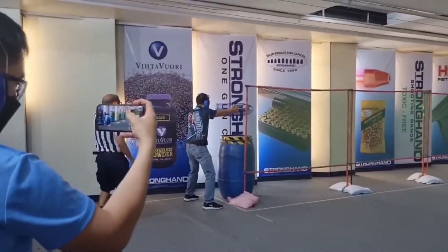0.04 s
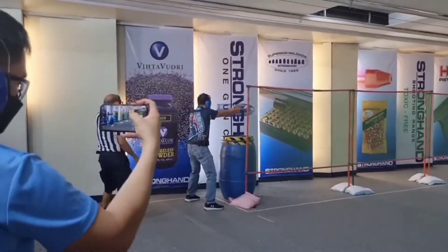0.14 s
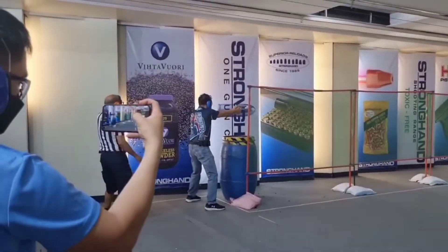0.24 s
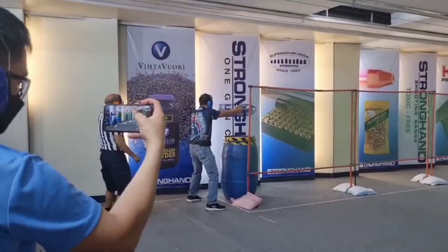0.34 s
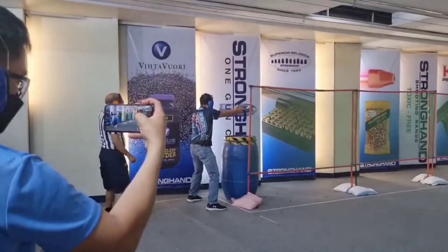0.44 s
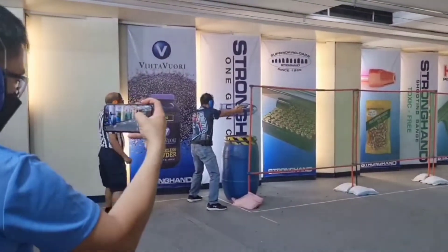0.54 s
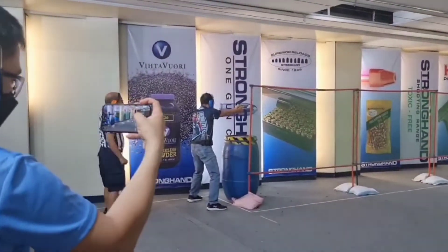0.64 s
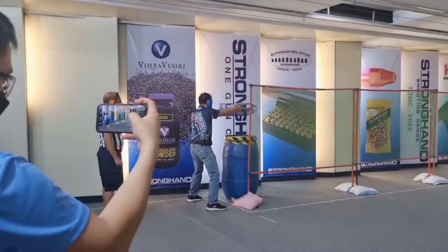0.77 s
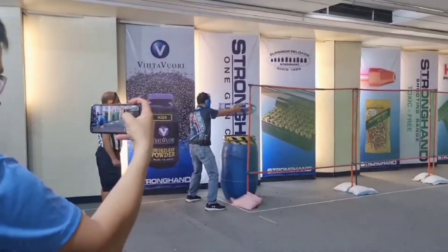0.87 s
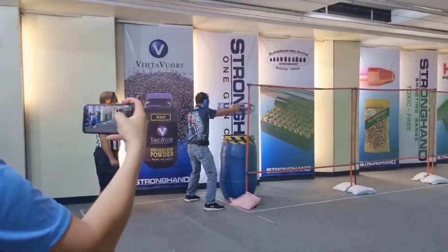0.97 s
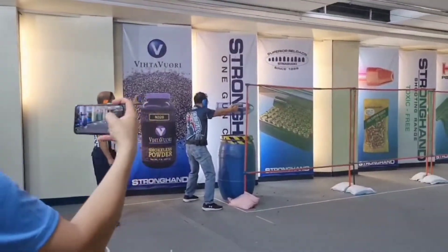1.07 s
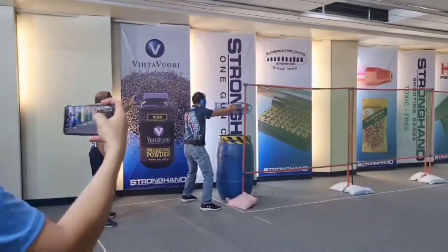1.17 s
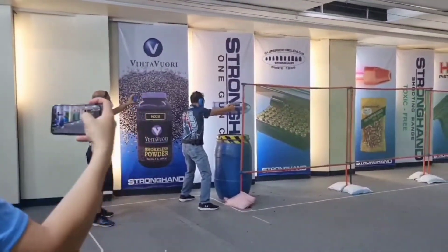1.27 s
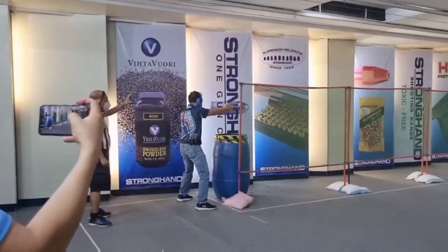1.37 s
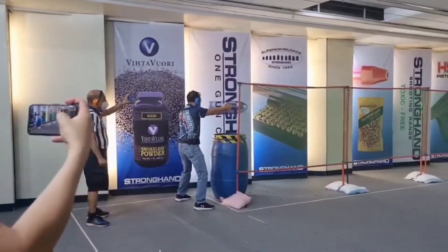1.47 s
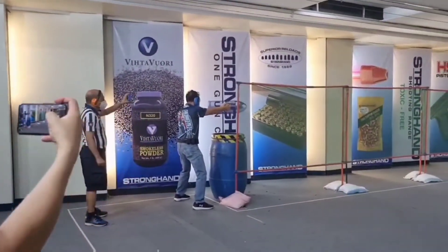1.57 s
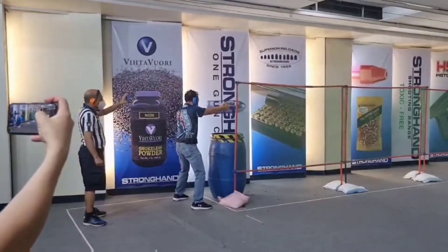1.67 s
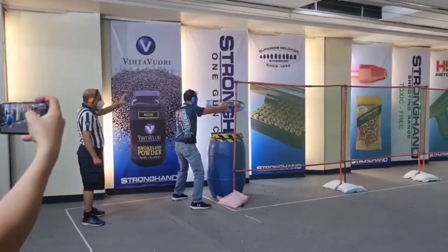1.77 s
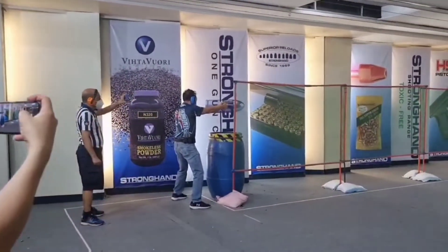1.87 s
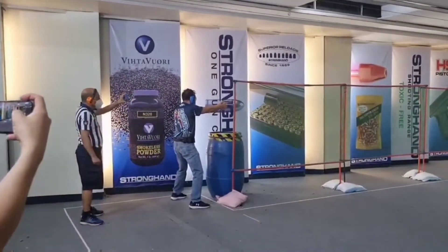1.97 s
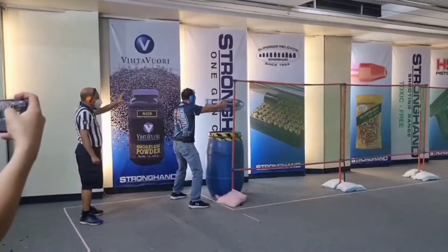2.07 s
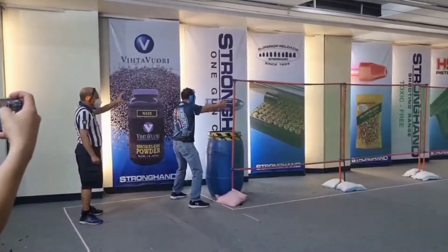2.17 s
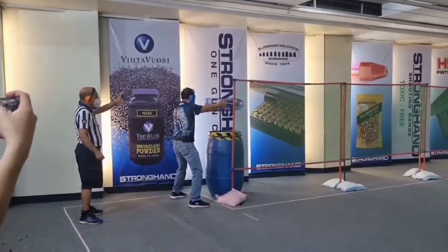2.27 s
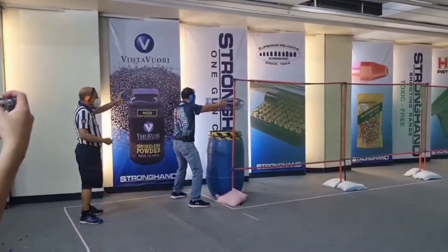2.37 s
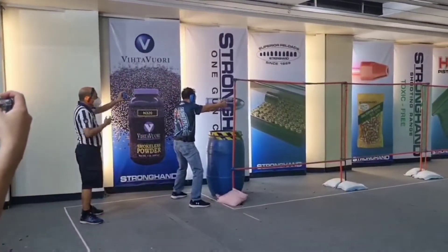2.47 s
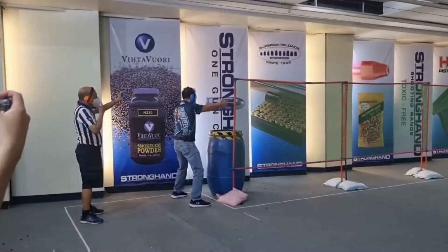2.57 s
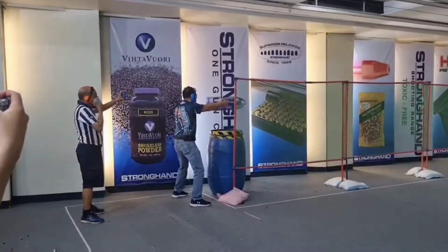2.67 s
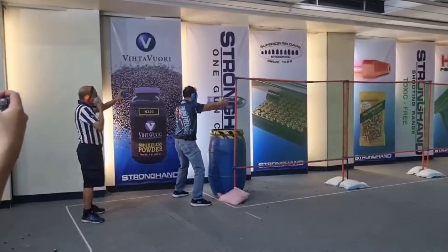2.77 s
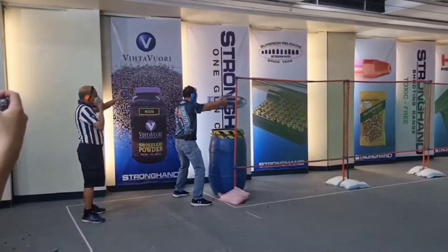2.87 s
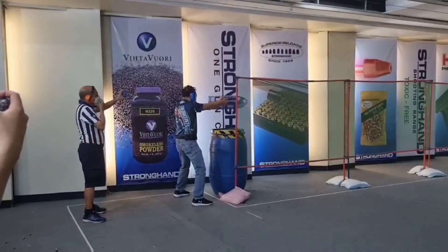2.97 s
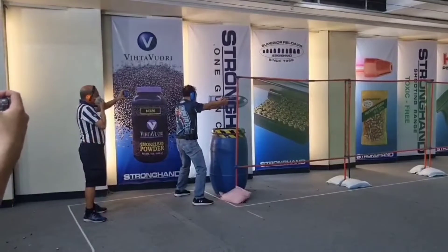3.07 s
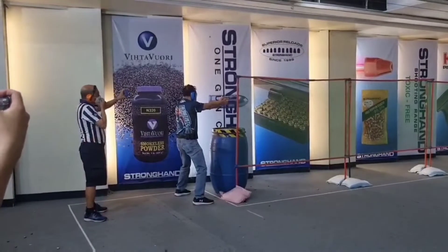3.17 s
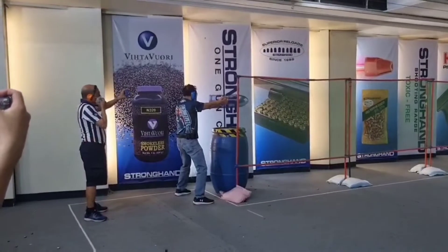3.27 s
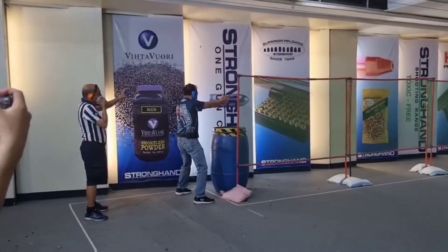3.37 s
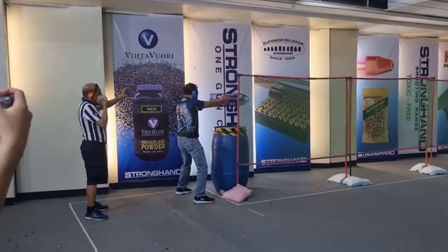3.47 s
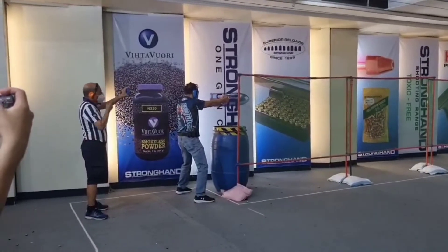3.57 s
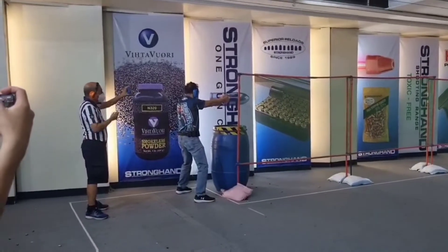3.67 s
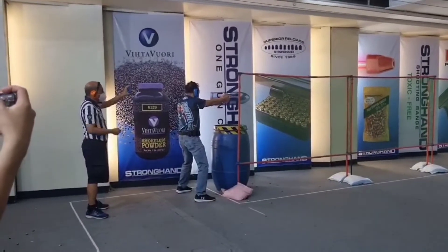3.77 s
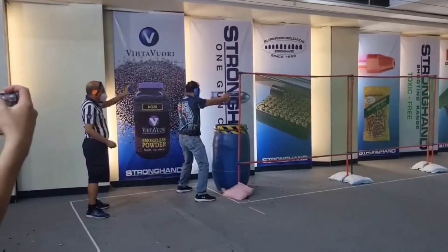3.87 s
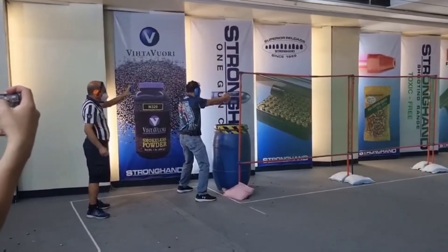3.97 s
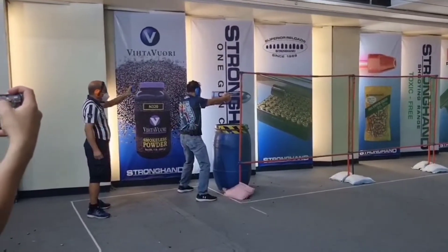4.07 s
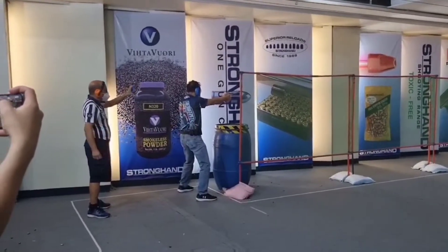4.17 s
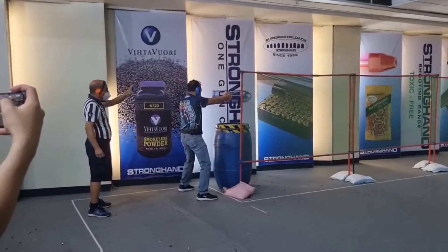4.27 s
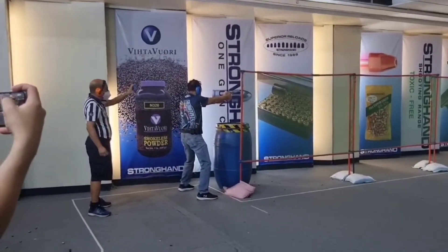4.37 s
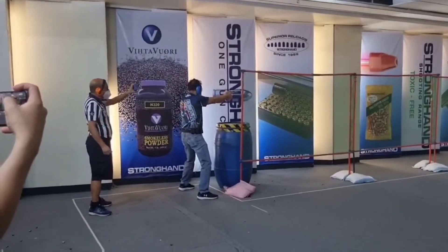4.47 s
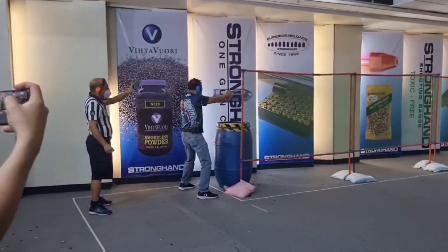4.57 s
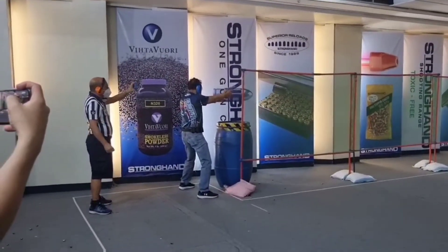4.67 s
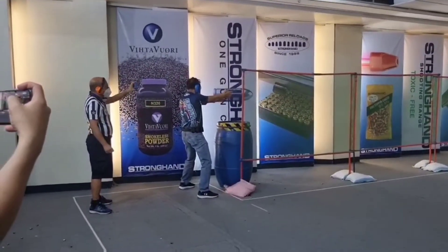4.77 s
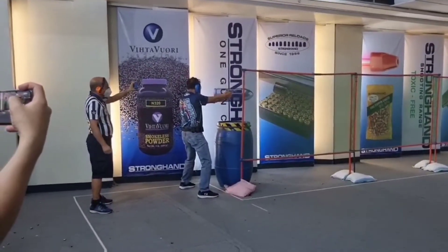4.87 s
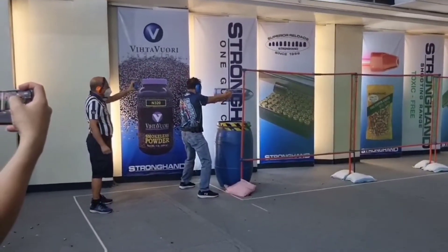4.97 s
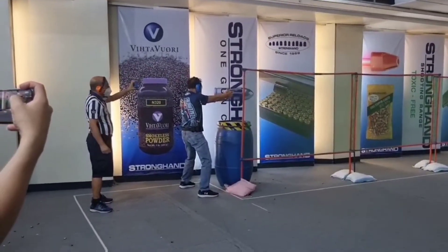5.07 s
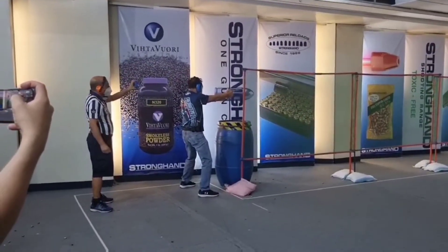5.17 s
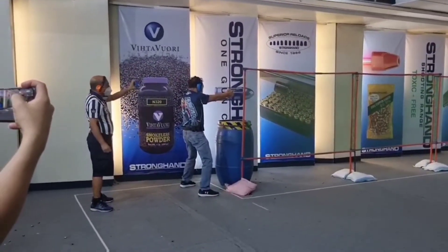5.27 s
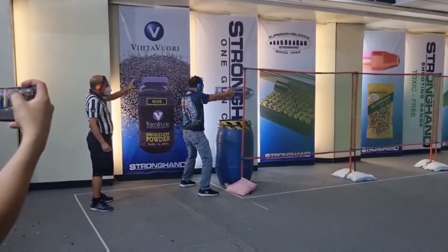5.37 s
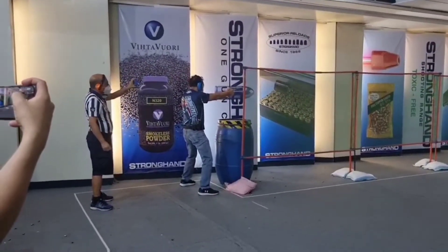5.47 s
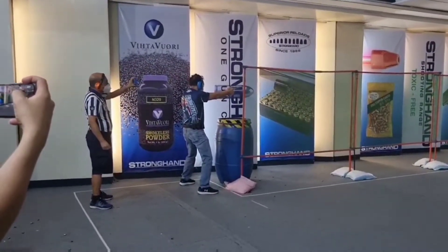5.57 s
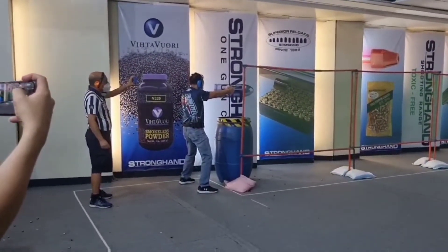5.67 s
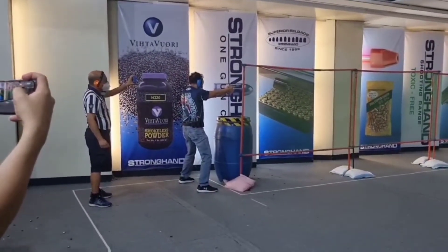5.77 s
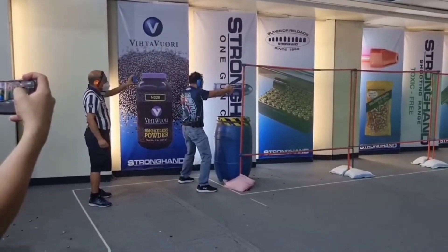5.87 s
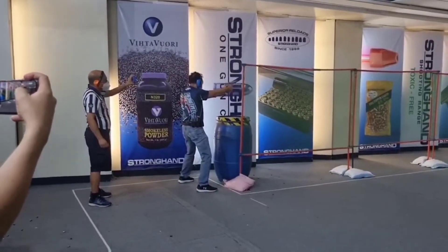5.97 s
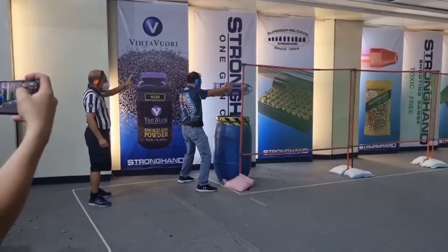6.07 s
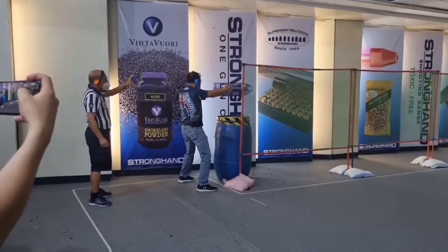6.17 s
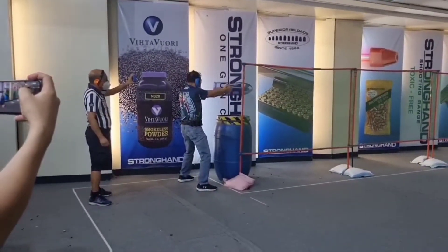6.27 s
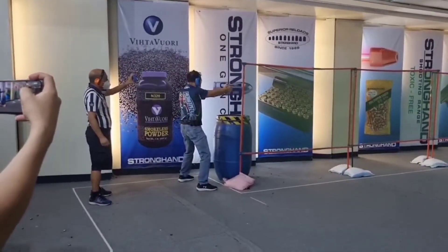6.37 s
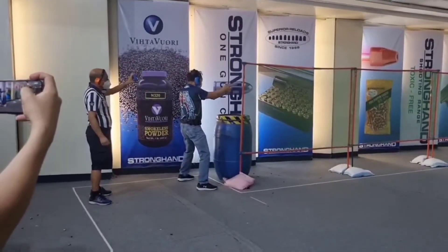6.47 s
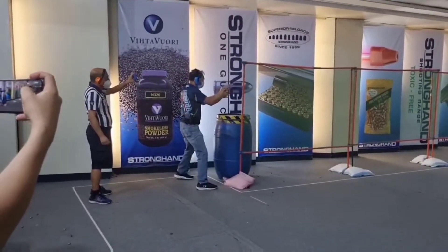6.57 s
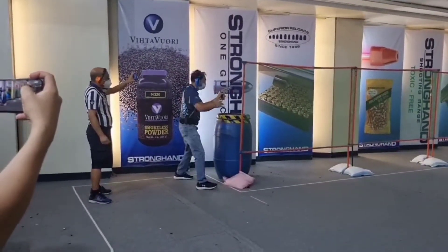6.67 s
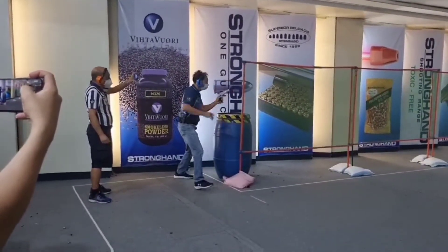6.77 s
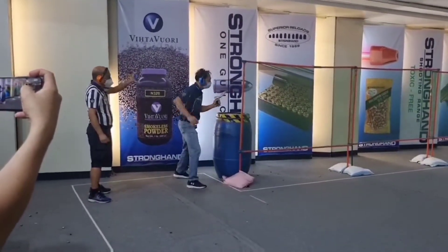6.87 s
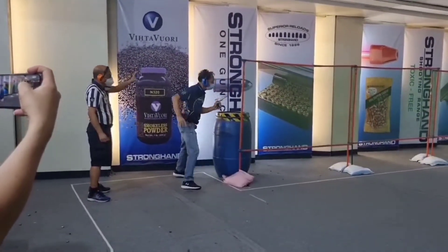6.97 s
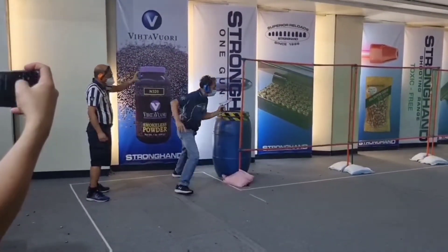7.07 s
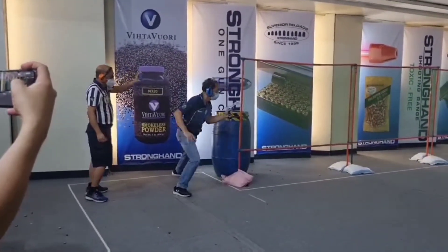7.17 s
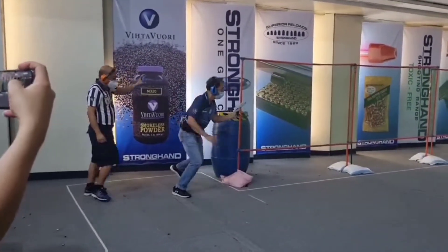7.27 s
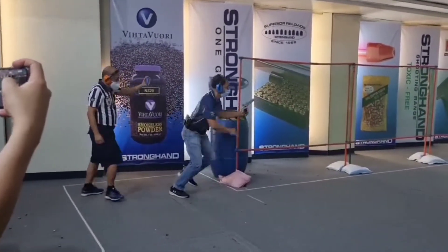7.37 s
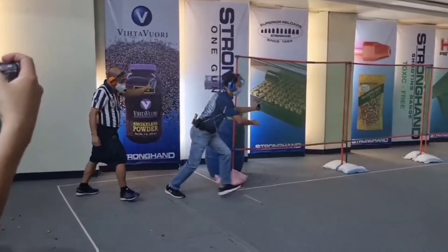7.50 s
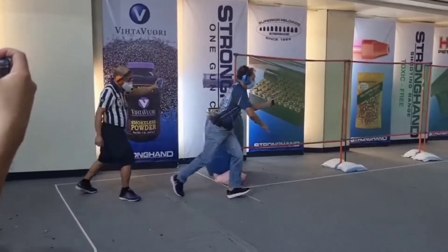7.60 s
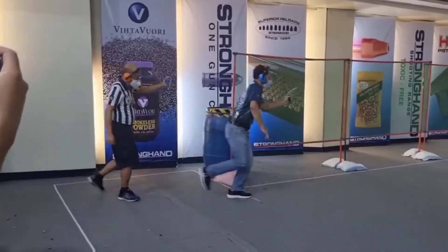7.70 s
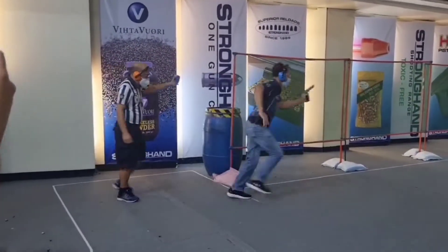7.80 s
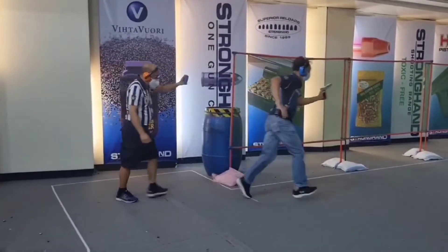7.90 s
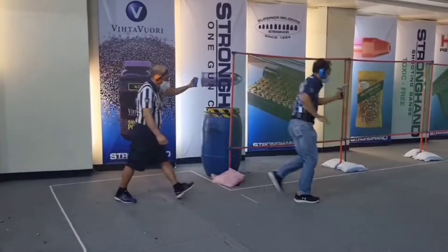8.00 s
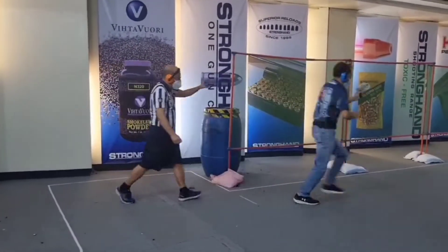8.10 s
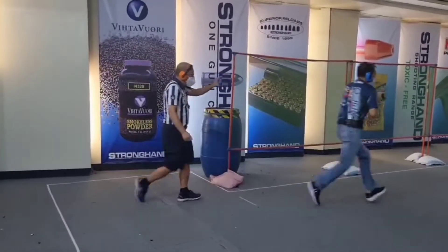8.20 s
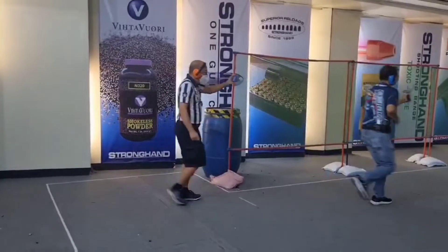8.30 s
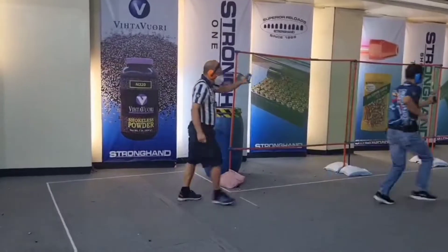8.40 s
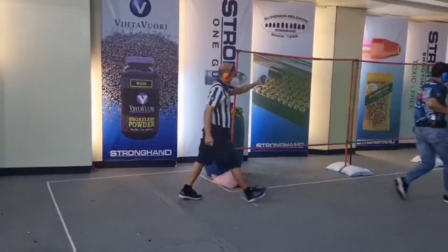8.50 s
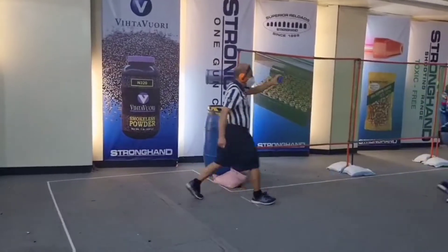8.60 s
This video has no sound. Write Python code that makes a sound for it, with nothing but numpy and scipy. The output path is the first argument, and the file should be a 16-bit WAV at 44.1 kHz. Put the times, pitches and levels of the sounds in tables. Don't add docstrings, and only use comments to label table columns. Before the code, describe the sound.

In a long concrete indoor shooting range, low generator hum and ventilation run steadily. Four loud pistol shots slam out about two seconds apart, each filling the hall with a dense short echo. A phone a few metres behind ducks the background after each blast. Dull clicks from far bays and a bouncing case fall between. Afterwards a steel plate rings faintly, metal clacks, and soft soles run.

```python
import sys
import numpy as np
from scipy import signal
from scipy.fft import rfft, irfft, next_fast_len
from scipy.io import wavfile
from scipy.ndimage import uniform_filter1d, minimum_filter1d, map_coordinates

SR = 44100
rng = np.random.default_rng(int(sys.argv[2]) if len(sys.argv) > 2 else 0)


def wav_record(signal):
    frames = np.transpose(np.atleast_2d(signal))
    bounded = np.clip(frames, -1, 1)
    quanta = np.round(bounded * 32767).astype(np.int16)
    wavfile.write(sys.argv[1], SR, quanta)


def rack_gain(trim_db):
    fader = np.asarray(trim_db, float)
    return 10 ** (fader / 20)


N = 381148

# pitch_hz, level_db per Hz
VENT_COLOUR = [(15, -46.5), (25, -12.5), (114, -9), (141, -13), (217, -12), (301, -17), (427, -13.5),
               (463, -23.5), (659, -18.5), (1400, -21.5), (2220, -18), (3520, -27), (7710, -31),
               (15000, -40), (16000, -48.5)]
# shaft_multiple, level_db
HUM_ORDERS = [(1, -11), (2, 2.5), (3, -21.5), (4, -8.5), (5, -14), (6, -12.5), (7, -13), (8, -15),
              (9, -16.5), (10, -15.5), (11, -18.5), (12, -14.5), (13, -18), (14, -15.5)]
# time_s, speed_hz
SHAFT_SPEED = [(0, 54.75), (1, 55.51), (7.8, 55.47), (8.198, 55.97)]
# start_s, level_db as heard, pitch_hz of the floor
FOOTFALLS = [
    (0.529, -25.5, 100.3),
    (8.097, -17.5, 131.3),
    (8.17, -24, 122.4),
    (8.28, -33, 45.4),
    (8.355, -23, 129.3),
    (8.45, -32, 51),
    (8.6, -25, 118.8),
]
# pitch_multiple, level_db
SLAB_MODES = [(1, 0.5), (1.45, -7), (2.3, -14), (2.9, -14.5)]
# pitch_hz, level_db, t60_s
PLATE_MODES = [(1143, -32, 2.4), (2160, -33, 1.2), (2575, -29, 1.4)]
# start_s, level_db as heard, first_note_hz, second_note_hz
FAR_SHOTS = [
    (1.7732, -25, 1950, 1270),
    (2.284, -30, 2160, 920),
    (3.9415, -27.5, 2110, 1140),
    (4.427, -37, 1320, 1930),
    (5.88, -32.5, 1897, 1320),
]
# start_s, level_db as heard, first_note_hz, second_note_hz
CLACKS = [
    (7.119, -27.5, 2265, 1690),
    (7.1218, -27, 1740, 804),
    (7.73, -25.5, 1490, 774),
    (7.736, -27, 2260, 1170),
    (7.98, -19, 2540, 4950),
    (8.107, -27, 1710, 2280),
    (8.123, -24, 2270, 3080),
    (8.211, -38, 2180, 1510),
]
# start_s, level_db as heard, first_note_hz, second_note_hz
JINGLES = [
    (6.49, -55, 11700, 13500),
    (7.94, -40.5, 8150, 8400),
]
# start_s, level_db as heard, brightness_db
CLACK_TAILS = [
    (7.121, -35.5, -6.5),
    (7.733, -37, -15),
    (7.979, -26, -2),
]
# start_s, level_db as heard, brightness_db
SCUFFS = [
    (6.63, -43, -37),
    (8.1, -29.5, -15),
    (8.5, -30, -23.5),
]
# pitch_hz, level_db per Hz
DULL_TAIL = [(60, -21), (180, -4.5), (400, -2), (900, -1), (2300, 1.5), (3500, -13.5), (6000, -28.5),
             (16000, -56.5)]
# pitch_hz, level_db per Hz
METAL_EDGE = [(1500, -35), (3500, 2), (5500, -5.5), (8000, -10.5), (11000, -25), (16000, -27)]
# start_s, level_db, extra_gain_drop_db
SHOTS = [
    (.756, 24.5, -3),
    (2.890, 25, -3.5),
    (4.696, 25.5, -3.5),
    (6.0117, 25.5, -3),
]
# pitch_hz, level_db per Hz
BLAST_COLOUR = [(24, -55), (40, -34), (167, -16.5), (199, -11.5), (290, -10.5), (433, -8.5), (630, -9),
                (942, -8.5), (1340, -12), (1950, -8.5), (2260, -6.5), (5440, -18), (13100, -21),
                (15200, -27.5), (16000, -39.5)]
# pitch_hz, level_db
BLAST_DETAIL = [(1100, 0), (1500, -0.5), (1900, -0.5), (2600, 2), (3150, 1), (3700, -2.5), (4500, -1)]
# pitch_hz, t60_s
HALL_DECAY = [(60, 1), (130, 0.65), (250, 0.66), (700, 0.76), (1300, 0.72), (2300, 0.68), (3500, 0.66),
              (12000, 0.44)]
# pitch_hz, correlation
LIKENESS = [(60, 0.9), (130, 0.98), (290, 0.9), (640, 0.62), (1410, -0.098), (3100, 0.16), (6820, -0.16),
            (15000, 0.26)]
# pitch_hz, level_db
PORT_DIFFERENCE = [(60, 1.5), (110, 0.5), (200, 1), (380, 1.5), (700, 3), (1290, 0), (2380, -5.5),
                   (4400, -1), (8120, 0), (15000, -4)]
# pitch_hz, level_db
MIC_RESPONSE = [(20, -7.5), (45, 2), (1700, 1), (2300, 2), (2900, -1), (3800, 0.5), (5000, 2), (8300, 0),
                (9800, -5), (12000, -0.5), (15200, -2.5), (16000, -8.5)]

DROP_DB, SAG_DB, SAG_BEND = -22, -4.5, .9
HOLD_S, RETURN_S, RETURN_BEND = 1.186, 0.67, 2.1
FRONT_CYCLES, JINGLE_CYCLES = 2.4, 98


def unit(x):
    return x / np.sqrt(np.mean(x ** 2) + 1e-20)


def along(points, hz):
    f, v = np.transpose(points)
    return np.interp(np.log(hz + 1), np.log(f + 1), v)


def wobble(rate):
    coarse = np.arange(0, N + 64, 64)
    knots = rng.standard_normal(int(N * rate / SR) + 4)
    return np.interp(np.arange(N), coarse, map_coordinates(knots, [coarse * rate / SR]))


def patches(hz, t, depth_db):
    field = rng.standard_normal((len(hz), len(t)))
    field = uniform_filter1d(field, size=12, axis=0)
    field = uniform_filter1d(field, size=5, axis=1)
    return depth_db * unit(field)


def diffuse(seconds, field_db, size):
    hz, t, z = signal.stft(rng.standard_normal((2, round(seconds * SR))), SR, nperseg=size)
    spread = np.arccos(np.clip(along(LIKENESS, hz), -1, 1))[:, None] / 2
    mid, side = z[0] * np.cos(spread), z[1] * np.sin(spread)
    shaped = np.array([mid + side, mid - side]) * rack_gain(field_db(hz[:, None], t))
    return signal.istft(shaped, SR, nperseg=size)[1]


def add(track, s, sound):
    part = track[:, round(s * SR):][:, :sound.shape[-1]]
    part += sound[..., :part.shape[-1]]


def gain_db(t):
    drops = [(-9, 0)] + [(s - .003, extra) for s, _, extra in SHOTS]
    fired, extra_db = np.transpose(drops)
    last = np.searchsorted(fired, t) - 1
    since = t - fired[last]
    down = DROP_DB + SAG_DB * np.minimum(since / HOLD_S, 1) ** SAG_BEND
    back = np.exp(-(np.maximum(since - HOLD_S, 0) / RETURN_S) ** RETURN_BEND)
    return np.where(last == 0, 0, down * back + extra_db[last])


def ventilation():
    air_db = lambda hz, t: along(VENT_COLOUR, hz) + patches(hz, t, depth_db=2.0)
    air = diffuse(N / SR + .1, air_db, size=2048)[:, :N]
    return rack_gain(-30 + 0.26 * wobble(6.2)) * unit(air)


def generator():
    speed_hz = np.interp(np.arange(N) / SR, *np.transpose(SHAFT_SPEED))
    turns = np.cumsum(speed_hz * (1 + .003 * wobble(6))) / SR
    out = np.zeros((2, N))
    for k, db in HUM_ORDERS:
        likeness = np.clip(along(LIKENESS, k * speed_hz[0]), -1, 1)
        lag = np.arccos(likeness) * np.array([[.5], [-.5]])
        drift = rng.random() + 0.059 * wobble(6.3)
        level = rack_gain(db + 0.54 * wobble(1.7) + 2.2 * wobble(18))
        out += level * np.sin(2 * np.pi * (k * turns + drift) + lag)
    return rack_gain(-31) * unit(out)


def footsteps():
    toe_delay_s, toe_db = .019, -1.5
    out, t = np.zeros((2, N)), np.arange(SR // 5) / SR
    for s, db, hz in FOOTFALLS:
        ring = sum(rack_gain(mode_db) * np.sin(2 * np.pi * k * hz * t) for k, mode_db in SLAB_MODES)
        thump = ring * (t / 0.013) * np.exp(1 - t / 0.0088)
        level_db = db - gain_db(s)
        add(out, s, rack_gain(level_db) * thump)
        add(out, s + toe_delay_s, rack_gain(level_db + toe_db) * thump)
    return out


def steel_target():
    out, t = np.zeros((2, N)), np.arange(SR) / SR
    for hz, db, t60 in PLATE_MODES:
        phase = rng.uniform(-0.49, .5, (2, 1))
        swell = (1 - np.exp(-t / .03)) * (1 - t) * rack_gain(3 * wobble(22)[:SR] - 2)
        add(out, 6.66, rack_gain(db - 60 * t / t60) * swell * np.sin(2 * np.pi * hz * t + phase))
    return out


def magazine():
    s, db, hz, t60 = 7.732, -43, 2290, .5
    out, t = np.zeros((2, N)), np.arange(SR // 2) / SR
    note = np.sin(2 * np.pi * hz * t + 0.74 * wobble(27)[:len(t)])
    level_db = db - gain_db(s) - 60 * t / t60 + 1.4 * wobble(50)[:len(t)]
    add(out, s, rack_gain(level_db) * note)
    return out


def case_bounces():
    first_s, gap_s, shrink = 2.615, .135, .46
    level_db, loss_db, notes_hz = -16, 7.5, (2370, 1300)
    landed = [first_s + gap_s * (1 - shrink ** k) / (1 - shrink) for k in range(3)]
    return [(s, level_db - loss_db * k, *notes_hz) for k, s in enumerate(landed)]


def clicks():
    snap_delay_s, snap_db, snap_hz = .005, -23.5, (4040, 3130)
    out, t = np.zeros((2, N)), np.arange(SR // 25) / SR
    hits = FAR_SHOTS + case_bounces() + CLACKS
    fronts = [(*row, FRONT_CYCLES) for row in hits]
    fronts += [(s + snap_delay_s, db + snap_db, *snap_hz, 2 * FRONT_CYCLES) for s, db, *_ in hits]
    fronts += [(*row, JINGLE_CYCLES) for row in JINGLES]
    for s, db, first_hz, second_hz, cycles in fronts:
        u = t * first_hz / cycles
        notes = np.sin(2 * np.pi * first_hz * t) + rack_gain(-2.0) * np.sin(2 * np.pi * second_hz * t)
        front = notes * (u * np.exp(1 - u)) ** 1.4
        add(out, s, rack_gain(db - 3.5 - gain_db(s)) * front)
        add(out, s + 0.0018, rack_gain(db - 24.0 - gain_db(s)) * front)
    return out


def wall_answers(hits, under_db, bright_db, t60_s, rise_ms):
    return [(s + 0.0022, db + under_db, bright_db, t60_s, rise_ms) for s, db, *_ in hits]


def small_tails():
    tails = wall_answers(FAR_SHOTS, under_db=-14, bright_db=-41.5, t60_s=0.56, rise_ms=0.3)
    tails += wall_answers(case_bounces(), under_db=-21.5, bright_db=-21, t60_s=1.03, rise_ms=0.3)
    tails += [(*row, 0.5, 1.8) for row in CLACK_TAILS]
    tails += [(*row, .45, 14) for row in SCUFFS]
    out = np.zeros((2, N))
    for s, db, bright_db, t60, rise_ms in tails:
        def tail_db(hz, u):
            dull, bright = along(DULL_TAIL, hz), bright_db + along(METAL_EDGE, hz)
            colour = 10 * np.log10(rack_gain(2 * dull) + rack_gain(2 * bright))
            return colour - 60 * u / max(t60, .03) + 5 * np.exp(-u / 0.018)

        tail = diffuse(.6, tail_db, size=512)
        u = np.arange(tail.shape[1]) / SR
        rise = 1 - np.exp(-1000 * u / max(rise_ms, .5))
        early_rms = np.sqrt(np.mean(tail[:, :SR // 40] ** 2))
        add(out, s, rack_gain(db - gain_db(s)) * rise * tail / early_rms)
    return out * rack_gain(2 * wobble(160))


def pistol_shots():
    def blast_db(hz, t):
        far_wall = 1.2 * np.exp(-((t - .36) / 0.013) ** 2)
        colour = along(BLAST_COLOUR, hz) + along(BLAST_DETAIL, hz)
        return colour - 60 * t / along(HALL_DECAY, hz) + far_wall + patches(hz, t, depth_db=1.0)

    out = np.zeros((2, N))
    for s, db, _ in SHOTS:
        tail = diffuse(2, blast_db, size=1024)
        t = np.arange(tail.shape[1]) / SR
        tail = tail / np.sqrt(np.mean(tail[:, :SR // 10] ** 2))
        add(out, s, rack_gain(db) * tail * (1 - np.exp(-t / 0.0011)))
    return out


def scene():
    background = ventilation() + generator()
    movement = footsteps() + steel_target() + magazine()
    return background + movement + clicks() + small_tails() + pistol_shots()


def band_limit(x):
    return signal.sosfilt(signal.butter(12, 16490, fs=SR, output="sos"), x)


def record(dry):
    m = next_fast_len(N + 8192)
    hz = np.fft.rfftfreq(m, 1 / SR)
    tilt = along(MIC_RESPONSE, hz) + along(PORT_DIFFERENCE, hz) * np.array([[.5], [-.5]])
    x = irfft(rfft(dry, m) * rack_gain(tilt), m)[:, :N]
    x = x * rack_gain(uniform_filter1d(gain_db(np.arange(N) / SR), size=100))
    power = np.abs(uniform_filter1d(np.mean(x ** 2, axis=0), size=400))
    squeeze = (1 + (power / rack_gain(2 * -17.5)) ** 1.956) ** (-.6 / 4.55)
    x = x * uniform_filter1d(minimum_filter1d(squeeze, size=160), size=80)
    x = x / (1 + np.abs(x / .95) ** 3) ** (1 / 3)
    x = irfft(rfft(x, m) / (1 + (hz / 15150) ** 150), m)[:, :N]
    return band_limit(x)


dry = scene()
out = record(dry)
wav_record(out)
```